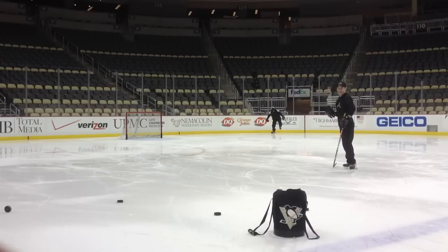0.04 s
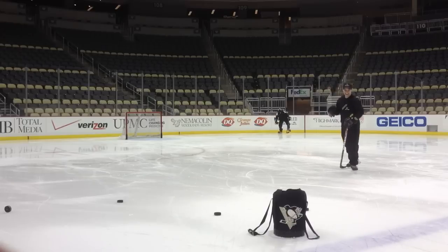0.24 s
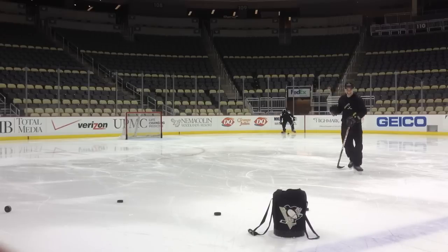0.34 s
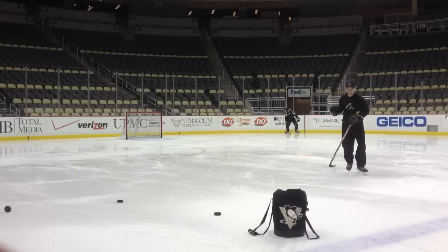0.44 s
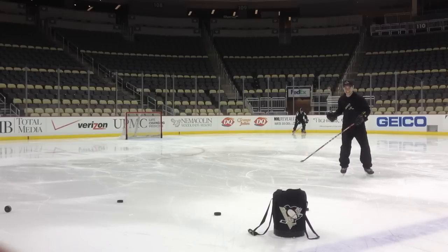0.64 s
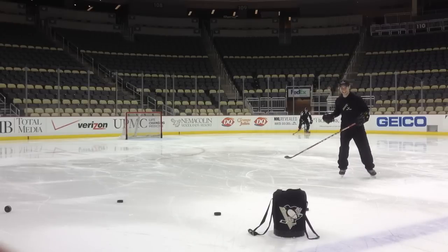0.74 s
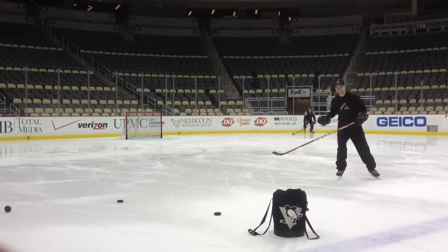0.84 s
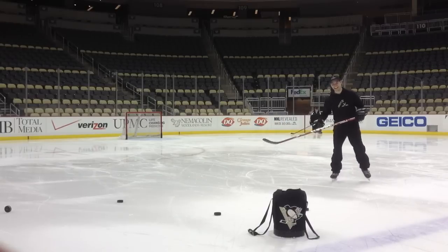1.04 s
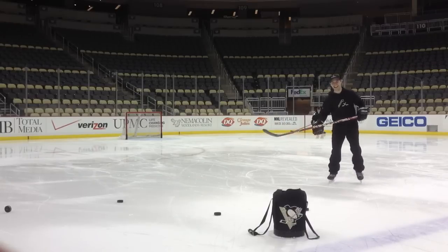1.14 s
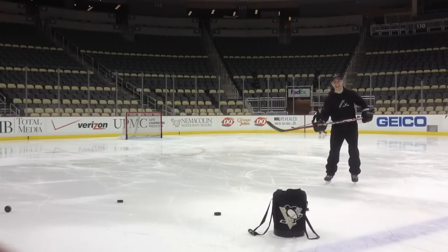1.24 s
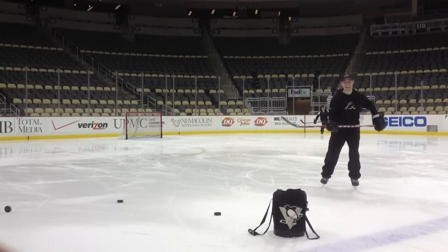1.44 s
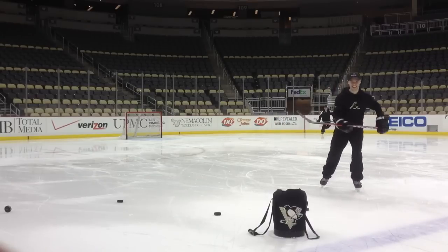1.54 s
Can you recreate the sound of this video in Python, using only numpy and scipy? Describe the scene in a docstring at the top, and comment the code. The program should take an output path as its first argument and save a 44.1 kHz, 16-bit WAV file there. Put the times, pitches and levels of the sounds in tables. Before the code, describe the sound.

A hockey stick cracks sharply against a puck in a big empty ice arena, echoing long

```python
"""A hockey stick slaps the ice and cracks against a puck in a large empty arena; a duller puck landing follows.
Filtered noise bursts make the impacts, damped modes the ring of the stick and the knock of the puck.
Boards and stands return delayed, scattered echoes beside a long, darkening noise reverberation.
Ventilation, mains hum and faint skate ticks lie underneath; a gain control ducks at the crack and recovers."""
import sys
import numpy as np
from scipy import signal
from scipy.fft import rfft, irfft
from scipy.io import wavfile
from scipy.ndimage import uniform_filter1d

SR = 44100
rng = np.random.default_rng(int(sys.argv[2]) if len(sys.argv) > 2 else 0)


def output_pcm(signal):
    """Save a mono or channel-first signal as 16-bit PCM at the path in sys.argv[1].

    Samples are clipped to [-1, 1] before scaling.
    """
    pcm = np.clip(np.atleast_2d(signal).T, -1, 1) * 32767
    wavfile.write(sys.argv[1], SR, np.round(pcm).astype(np.int16))


N = 70560
TIME_S = np.arange(N) / SR
CONTACT_T60_S = 0.0017


def undb(db):
    """Decibels to amplitude gain."""
    return 10 ** (np.asarray(db) / 20)


def fade(t60_s):
    """Exponential decay from the first sample, -60 dB at t60_s."""
    return np.exp(-np.log(1000) * TIME_S / max(t60_s, 1e-3))


def colour(x, points):
    """Minimum-phase filter through (frequency [Hz], level [dB]) points; keeps the power of white noise."""
    hz, db = np.array(points).T
    log_hz = np.log(np.fft.rfftfreq(2 * N, 1 / SR) + 1)
    gain = undb(np.interp(log_hz, np.log(hz), db))
    gain = gain / np.sqrt(np.mean(gain ** 2))
    cepstrum = irfft(np.log(gain))
    # fold onto positive time: causal response
    cepstrum[1:N] *= 2
    cepstrum[N + 1:] = 0
    response = np.exp(rfft(cepstrum))
    return irfft(rfft(x, 2 * N) * response)[:N]


def soften(x, cutoff_hz):
    """Two-pole low-pass."""
    sos = signal.butter(2, min(cutoff_hz, SR / 2 - 1), fs=SR, output="sos")
    return signal.sosfilt(sos, x)


def delay(x, delay_s):
    """The same sound delay_s later."""
    return np.concatenate([np.zeros(int(delay_s * SR)), x])[:N]


def burst(t60_s):
    """Decaying noise, its spectrum evened out, with the energy of fade(t60_s)."""
    x = rng.standard_normal(N) * fade(t60_s)
    for _ in range(2):
        flat = irfft(np.exp(1j * np.angle(rfft(x))), N)
        x = flat * fade(2 * t60_s)
    return x * np.sqrt(np.sum(fade(t60_s) ** 2) / np.sum(x ** 2))


def ring(modes):
    """Damped modes struck together, building up over the contact."""
    out = 0
    for hz, db, t60_s in modes:
        tone = np.cos(2 * np.pi * hz * TIME_S)
        out = out + undb(db) * tone * fade(t60_s) * (1 - fade(CONTACT_T60_S))
    return out


# blade on ice and puck: (time [s], relative level [dB], low-pass cutoff [Hz])
BLADE_CONTACTS = [(0.2318, -4, 8550), (0.2355, 5, 1770), (0.2397, -1, 7960), (0.2445, 0.5, 2970),
                  (0.2527, 6.5, 2580), (0.255, 4.5, 6170), (0.2614, -6, 7450), (0.263, -29, 6000),
                  (0.2712, -4.5, 8250)]
# crack spectrum: (frequency [Hz], relative level [dB])
CRACK_SPECTRUM = [(60, -18.5), (170, -24.5), (310, -10.5), (500, -12), (950, -7.5), (1300, 1.5), (1750, -4),
                  (2200, 1.5), (2800, -2.5), (5000, -3), (5700, -15.5), (8000, -12), (9400, -23),
                  (10800, -13.5), (15000, -20)]
CRACK_DB, CRACK_T60_S = -7, 0.018
RATTLE_DB, RATTLE_T60_S = -14, 0.15


def shot():
    """Each contact cracks and rattles the blade, with its own level and brightness."""
    out = 0
    for time_s, db, cutoff_hz in BLADE_CONTACTS:
        crack = undb(CRACK_DB) * burst(CRACK_T60_S)
        rattle = undb(RATTLE_DB) * rng.standard_normal(N) * fade(RATTLE_T60_S)
        impact = soften(colour(crack + rattle, CRACK_SPECTRUM), cutoff_hz)
        out = out + undb(db) * delay(impact, time_s)
    return out


# stick resonances: (frequency [Hz], relative level [dB], t60 [s])
STICK_RESONANCES = [(311, -25, .08), (524.5, -18, 0.071), (1139, -46, 0.11), (1282, -4.5, 0.067),
                    (1358, -9, 0.058), (1507.2, -8, 0.036), (2085, -14.5, 0.045), (2253, -26.5, .11),
                    (2640, -25, 0.3), (2923, -22.5, 0.19), (3295, -29, 0.24), (3734, -20, 0.11),
                    (3844, -23.5, 0.16), (4714, -27, 0.26)]
STICK_DB, STICK_HALL_DB = -7.5, -3.5  # STICK_HALL_DB: extra gain into the arena


def stick():
    """Every contact feeds energy into the modes of the stick, which then ring down."""
    energy = sum(undb(db) ** 2 * delay(fade(CONTACT_T60_S), time_s) for time_s, db, _ in BLADE_CONTACTS)
    energy = energy / np.sum(fade(CONTACT_T60_S))
    since_first_s = TIME_S - BLADE_CONTACTS[0][0]
    out = 0
    for hz, db, t60_s in STICK_RESONANCES:
        energy_leak = np.exp(-2 * np.log(1000) / t60_s / SR)
        stored = signal.lfilter([1], [1, -energy_leak], energy)
        out = out + undb(db) * np.sqrt(stored) * np.sin(2 * np.pi * hz * since_first_s)
    return undb(STICK_DB) * out


# puck on ice: (time [s], level [dB])
PUCK_CONTACTS = [(0.3694, -15), (0.3718, -15), (0.3777, -17.5)]
# landing spectrum: (frequency [Hz], relative level [dB])
LANDING_SPECTRUM = [(60, -22), (200, -15), (320, -3), (520, 5), (900, 2), (1300, 10.5), (1900, -3.5),
                    (2800, 4.5), (3800, -3.5), (4600, -11.5), (7500, -18), (9500, -19.5), (12000, -16),
                    (15000, -29)]
# landing resonances: (frequency [Hz], relative level [dB], t60 [s])
LANDING_RESONANCES = [(547, -15.5, 0.042), (1250, -22, 0.019), (1286, -3, 0.049), (1633, -14.5, 0.18),
                      (3475, -16, .05), (3900, -14.5, 0.052), (7240, -22.5, .04)]
LANDING_T60_S, LANDING_CUTOFF_HZ = 0.032, 7100
LANDING_HALL_DB = 8.5  # extra gain into the arena


def landing():
    """The puck slaps down on the ice, one edge after the other: noise bursts plus damped modes."""
    body = ring(LANDING_RESONANCES)
    out = 0
    for time_s, db in PUCK_CONTACTS:
        slap = colour(burst(LANDING_T60_S), LANDING_SPECTRUM)
        out = out + undb(db) * delay(slap + body, time_s)
    return soften(out, LANDING_CUTOFF_HZ)


# slaps from the far side: (time [s], relative level [dB], centre [Hz], width [Hz], t60 [s])
FAR_SLAPS = [(0.341, -14, 2560, 250, 0.029), (0.435, -14.5, 2430, 550, 0.075),
             (0.4903, -14.5, 1200, 450, 0.084), (0.5408, -16.5, 2498, 500, 0.027),
             (0.6183, -30, 2554, 1200, .025)]
SLAP_RISE_S, SLAP_TOP_HZ = 0.0019, 5100


def slaps():
    """Short narrow-band slaps thrown back from the far side of the rink."""
    out = 0
    for time_s, db, hz, width_hz, t60_s in FAR_SLAPS:
        source = burst(t60_s) * np.minimum(TIME_S / SLAP_RISE_S, 1)
        b, a = signal.iirpeak(hz, hz / width_hz, fs=SR)
        band = signal.lfilter(b, a, source)
        width_makeup = np.sqrt(SR / width_hz / np.pi)
        out = out + undb(db) * width_makeup * delay(band, time_s)
    return soften(soften(out, SLAP_TOP_HZ), SLAP_TOP_HZ)


# boards, glass and stands: (delay [s], level [dB], low-pass cutoff [Hz], scatter t60 [s])
REFLECTIONS = [(0.09, -54, 7040, 0.014), (0.184, -21.5, 8100, 0.039), (0.205, -22.5, 5000, 0.17),
               (0.258, -17, 6900, 0.044), (0.288, -22, 5860, 0.043), (0.362, -21.5, 4000, 0.026),
               (0.388, -23.5, 4630, 0.066), (0.472, -19, 2400, 0.079), (0.596, -33, 2000, 0.13),
               (0.691, -34, 3800, 0.11), (0.845, -25, 1210, 0.027), (0.985, -29, 1481, 0.046)]


def echoes():
    """Response of the large surfaces: each reflection is late, dulled and a little scattered."""
    out = 0
    for delay_s, db, cutoff_hz, t60_s in REFLECTIONS:
        scatter = burst(t60_s)
        scatter = scatter / np.linalg.norm(scatter)
        out = out + undb(db) * delay(soften(scatter, cutoff_hz), delay_s)
    return out


# arena reverberation: (band centre [Hz], relative level [dB], t60 [s])
HALL_BANDS = [(101.5, -28, 3.4), (304, 4, 6.67), (383, -4.5, 6.5), (560, 1.5, 6), (953, 5.5, 4.05),
              (1296, -8.5, 6.16), (2500, 2, 2.57), (4440, 1, 1.48), (7700, 11.5, 0.65), (15000, 13, 0.51)]
HALL_STEP_DB, HALL_STEP_AT_S, HALL_STEP_WIDTH_S, HALL_ONSET_S = -5.5, 0.37, 0.034, 0.15


def hall():
    """Diffuse response: thin until the far stands answer, then dying away, mostly treble first."""
    log_hz = np.log(np.fft.rfftfreq(N, 1 / SR) + 1)
    centres = np.log(np.array(HALL_BANDS)[:, 0])
    noise = rfft(rng.standard_normal(N))
    out = 0
    for selector, (_, db, t60_s) in zip(np.eye(len(HALL_BANDS)), HALL_BANDS):
        band = irfft(noise * np.interp(log_hz, centres, selector), N)
        out = out + undb(db) * band * fade(t60_s)
    # 1.25 steps early, 0.25 step late
    steps = 0.5 * (1.5 - np.tanh((TIME_S - HALL_STEP_AT_S) / HALL_STEP_WIDTH_S))
    onset = np.minimum(TIME_S / HALL_ONSET_S, 1)
    return out * undb(HALL_STEP_DB * steps) * onset / np.sqrt(SR)


FLUTTER_RMS_DB, FLUTTER_POINTS_PER_S = 0.5, 35


def flutter():
    """Uneven density of the reflections: a random gain, interpolated between points."""
    wander = np.interp(TIME_S * FLUTTER_POINTS_PER_S, np.arange(N), rng.standard_normal(N))
    return undb(FLUTTER_RMS_DB * wander)


# skate tick spectrum: (frequency [Hz], relative level [dB])
SKATE_SPECTRUM = [(200, -25), (2500, -2), (4800, 1.5), (6000, -3), (9500, -19.5), (13000, -5), (15500, -23)]
SKATE_DB, SKATE_PER_S, SKATE_SPREAD_DB, SKATE_T60_S = -56, 21, 6, 0.043


def skates():
    """Gliding blades chip the ice: random decaying ticks shape a hiss."""
    chips, hiss = np.zeros(N), rng.standard_normal(N)
    for when, size in rng.random((int(SKATE_PER_S * N / SR), 2)):
        chips[int(when * N)] += undb(-SKATE_SPREAD_DB * size)
    envelope = signal.fftconvolve(chips, fade(SKATE_T60_S))[:N]
    return colour(undb(SKATE_DB) * hiss * envelope, SKATE_SPECTRUM)


# ventilation spectrum: (frequency [Hz], relative level [dB])
AIR_SPECTRUM = [(25, -25), (75, -30), (110, -38), (170, -1.5), (300, 3), (500, 2), (850, 2.5), (1050, -10),
                (1500, -9), (3200, -23.5), (4900, -21.5), (5900, -32), (8500, -36.5), (10000, -40.5),
                (15000, -37)]
AIR_DB, HUM_HZ, HUM_DB = -43.5, 121, -55.5  # RMS levels


def ventilation():
    """Steady rush of air as coloured noise, with an electrical hum as a sine."""
    air = undb(AIR_DB) * colour(rng.standard_normal(N), AIR_SPECTRUM)
    hum = np.sqrt(2) * np.sin(2 * np.pi * HUM_HZ * TIME_S)
    return air + undb(HUM_DB) * hum


def scene():
    """Shot and landing, heard directly and through the arena, over the background."""
    crack, body, knock = shot(), stick(), landing()
    sent = crack + undb(STICK_HALL_DB) * body + undb(LANDING_HALL_DB) * knock
    response = echoes() + hall() * flutter()
    arena = signal.fftconvolve(sent, response)[:N]
    return (crack + body + knock + slaps() + arena + ventilation() + skates())[None]


LOW_CUT_HZ, TOP_HZ = 122, 15300
LIMIT_DB, DETECT_S, RELEASE_S = -10.5, 0.0022, 0.43  # RELEASE_S: time constant


def record(dry):
    """The bass is cut; a limiter clamps at once and lets go slowly; the top is cut."""
    low_cut = signal.butter(3, LOW_CUT_HZ, "high", fs=SR, output="sos")
    x = signal.sosfilt(low_cut, dry[0])
    level = np.sqrt(np.abs(uniform_filter1d(x ** 2, int(DETECT_S * SR) + 1)))
    leak = np.exp(-TIME_S / RELEASE_S)
    held = np.maximum.accumulate(level / leak) * leak  # peak hold with exponential release
    gain = np.minimum(1, undb(LIMIT_DB) / (held + 1e-9))
    top_cut = signal.ellip(8, 0.2, 70, TOP_HZ, fs=SR, output="sos")
    return signal.sosfilt(top_cut, x * gain)[None]


dry = scene()
out = record(dry)
output_pcm(out)
```